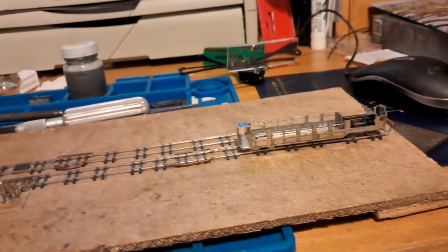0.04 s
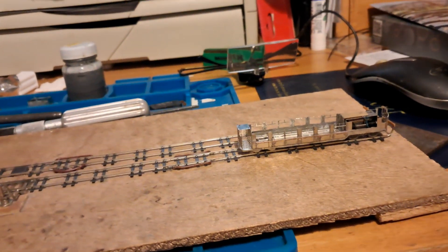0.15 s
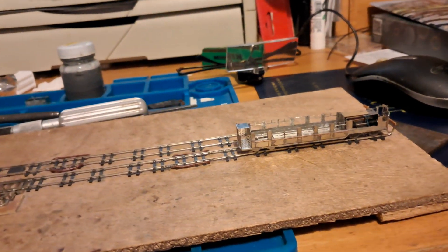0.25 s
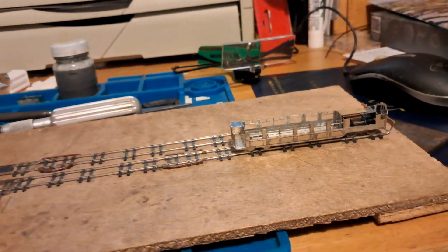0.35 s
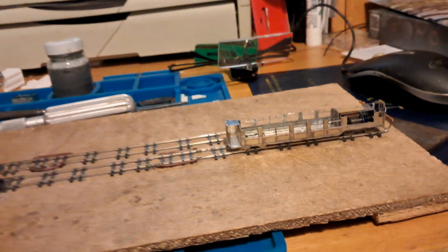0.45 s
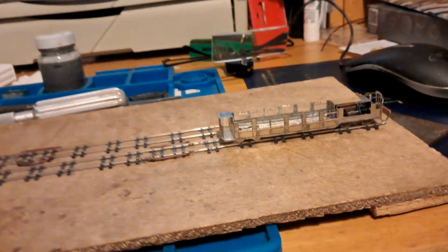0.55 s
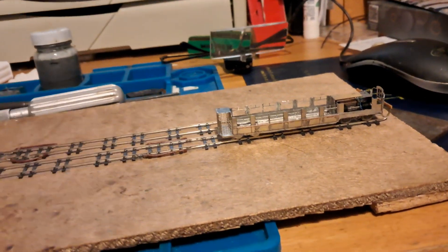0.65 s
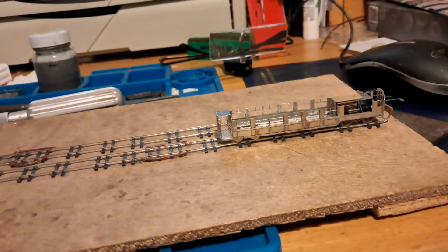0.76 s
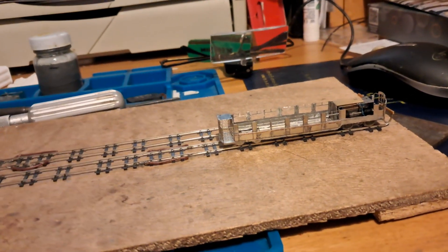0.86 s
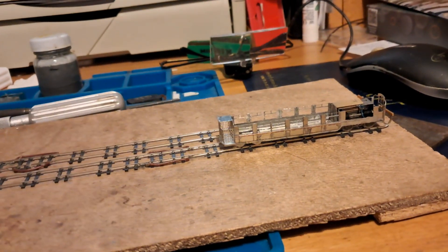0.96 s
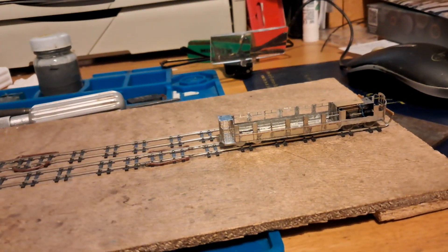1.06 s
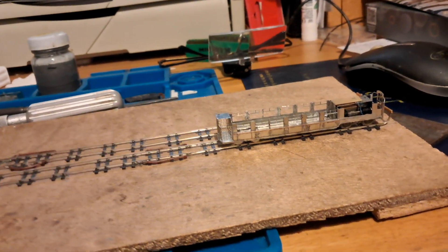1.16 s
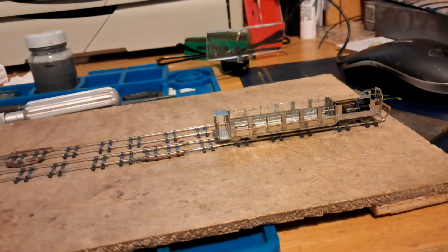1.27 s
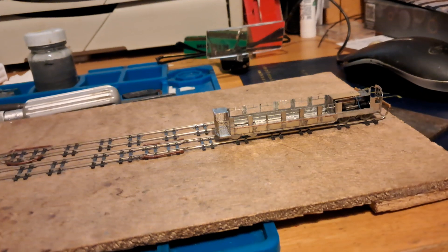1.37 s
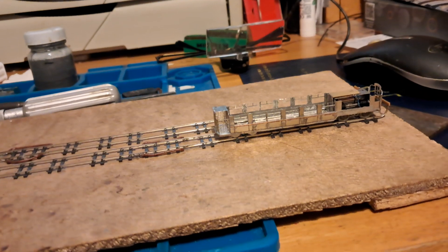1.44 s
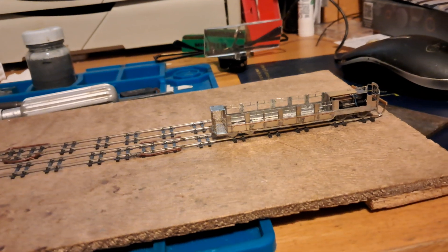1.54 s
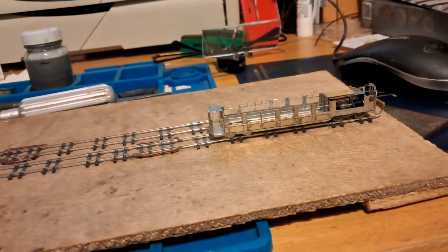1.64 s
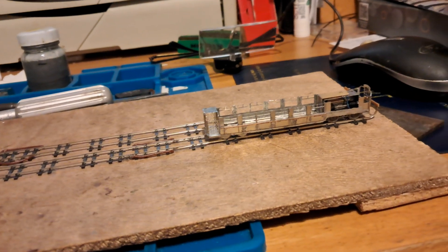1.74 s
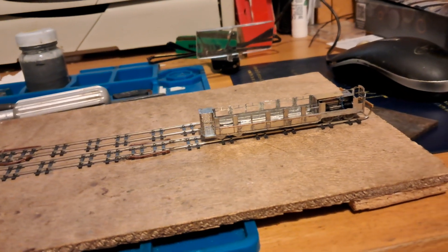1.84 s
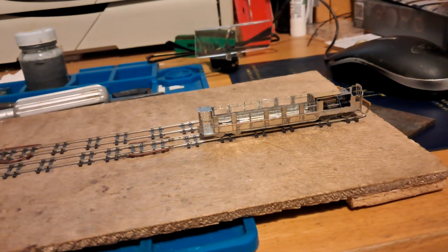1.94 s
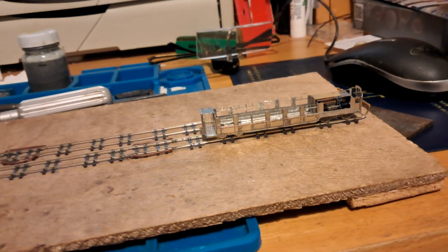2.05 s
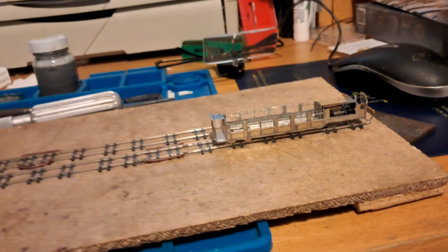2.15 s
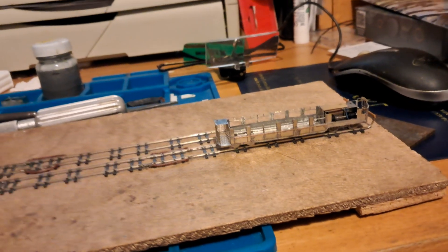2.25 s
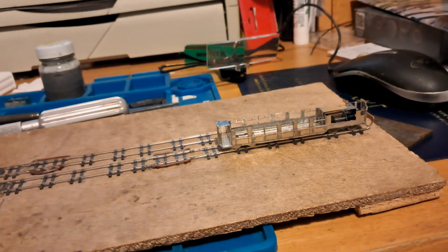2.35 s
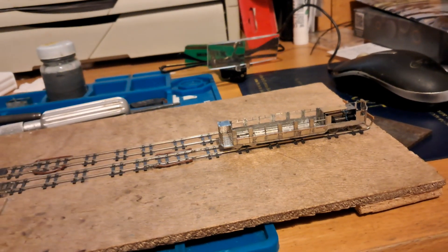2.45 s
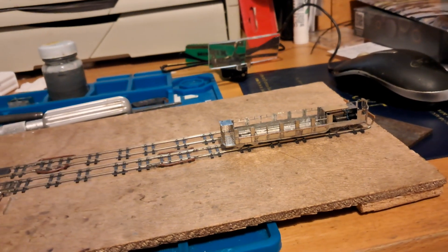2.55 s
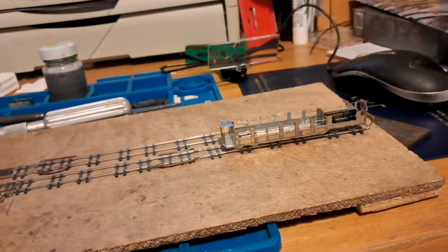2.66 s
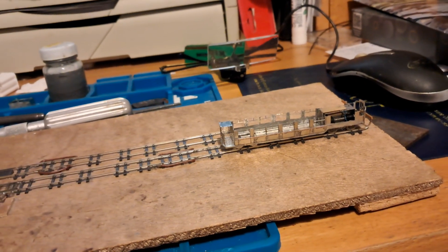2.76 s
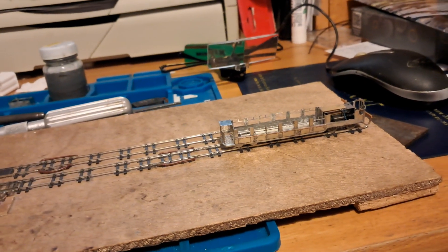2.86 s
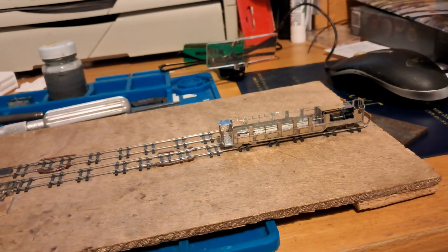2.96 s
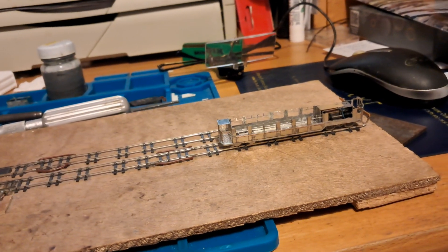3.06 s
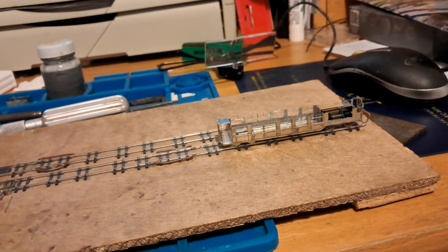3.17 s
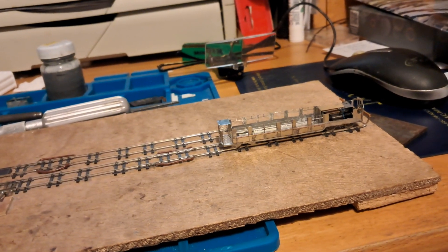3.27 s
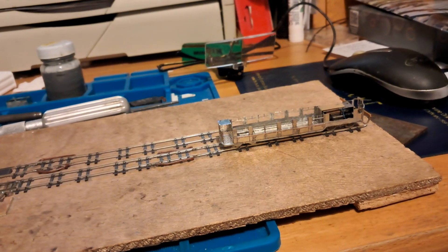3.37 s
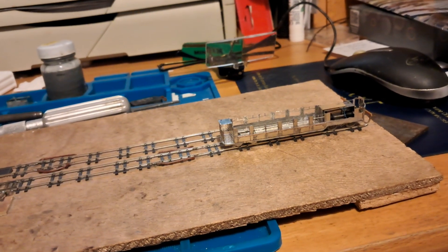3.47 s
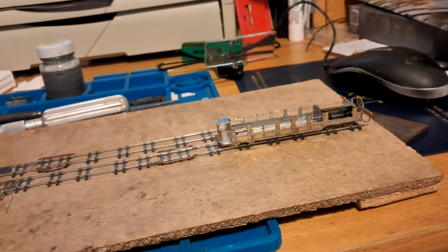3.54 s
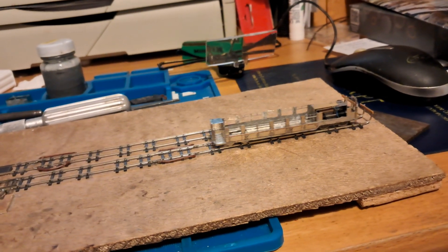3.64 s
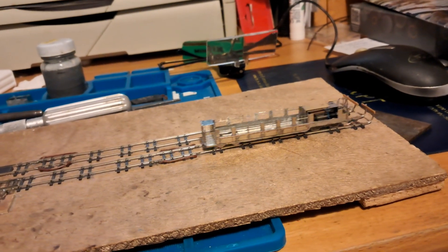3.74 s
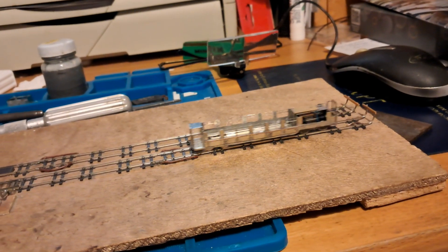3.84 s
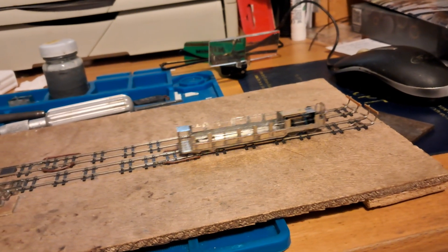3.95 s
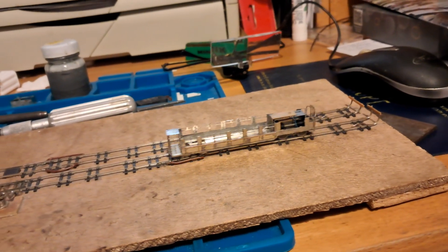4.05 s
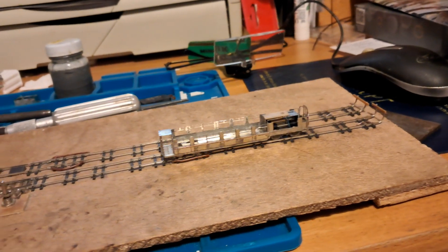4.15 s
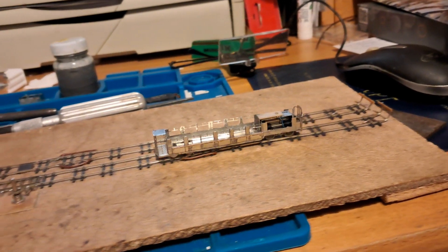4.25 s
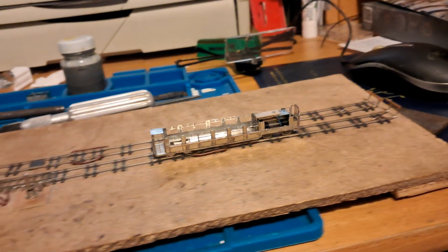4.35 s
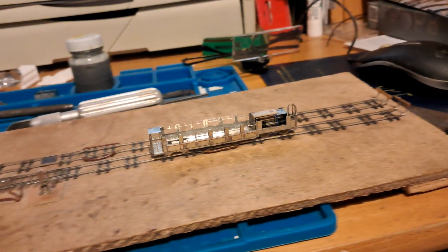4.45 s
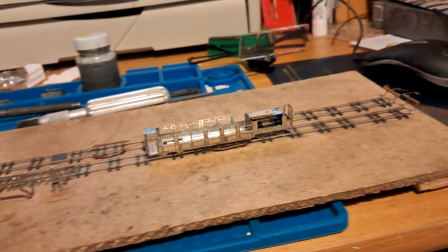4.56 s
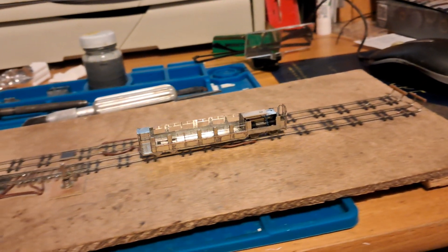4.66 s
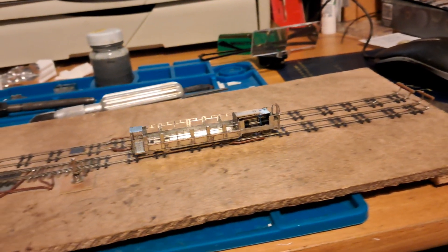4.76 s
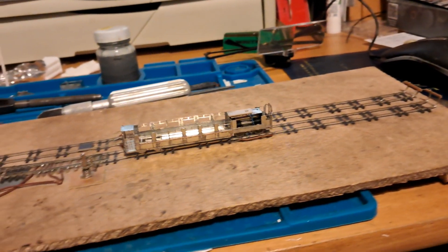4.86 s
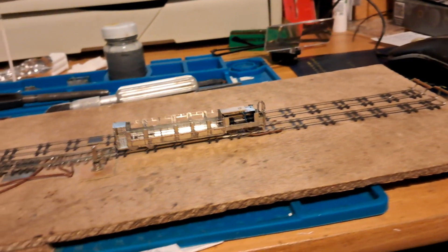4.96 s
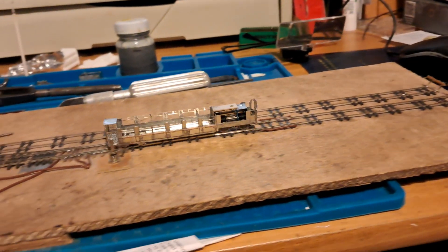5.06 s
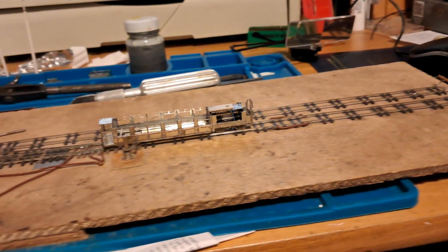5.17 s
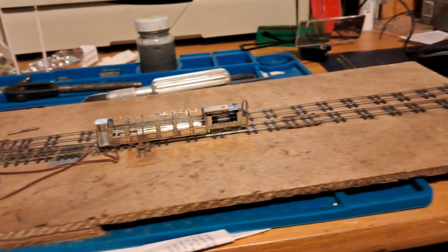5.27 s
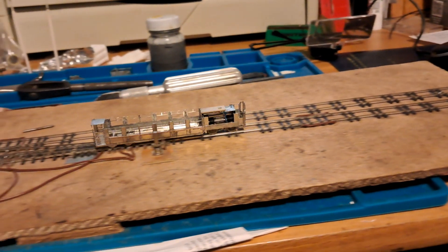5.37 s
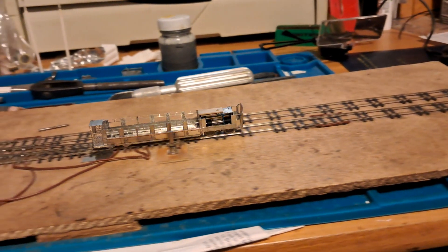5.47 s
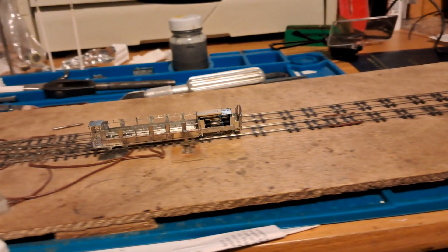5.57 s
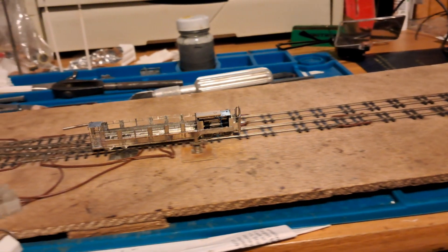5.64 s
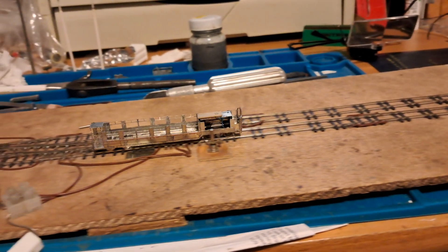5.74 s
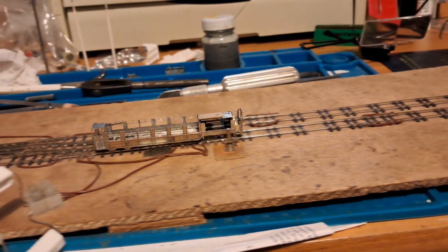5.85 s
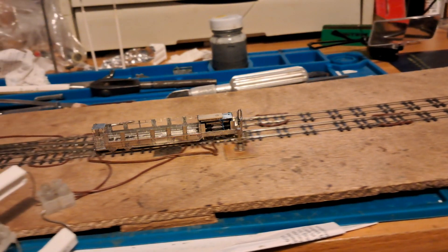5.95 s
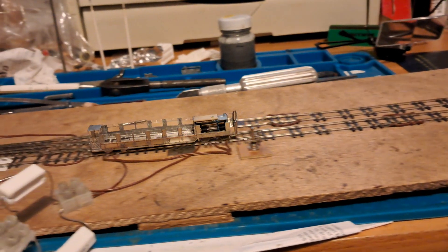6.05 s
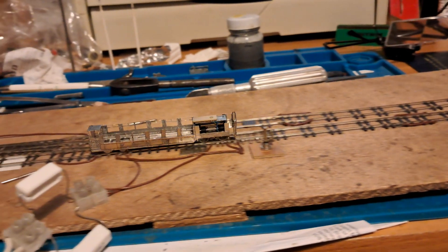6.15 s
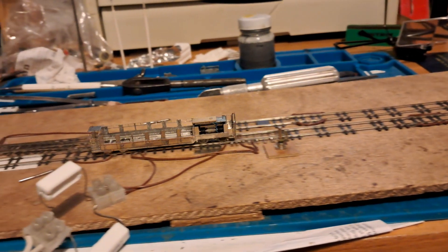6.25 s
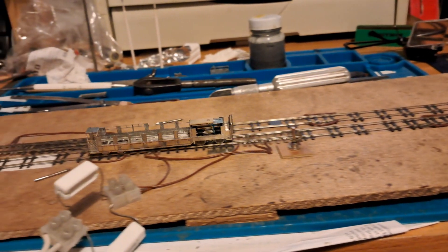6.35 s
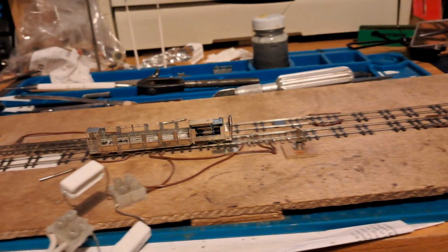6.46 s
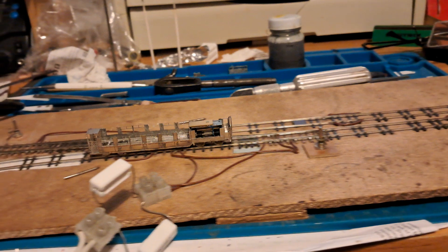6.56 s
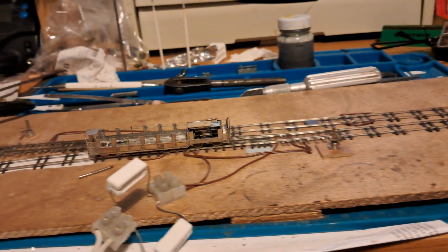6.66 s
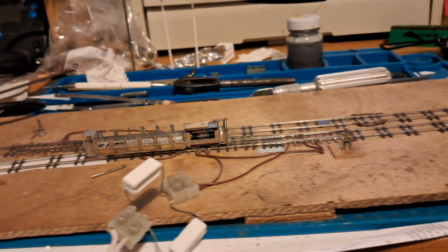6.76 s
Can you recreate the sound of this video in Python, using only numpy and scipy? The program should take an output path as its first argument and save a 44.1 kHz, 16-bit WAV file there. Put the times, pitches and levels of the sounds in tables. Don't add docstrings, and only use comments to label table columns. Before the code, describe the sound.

Half the time is near silence: still air, faint hiss, tiny bench touches and two crisp switch clicks with a short room rattle. After a small creak, a miniature electric rail car bursts into motion. Its gears chatter in thin metal, the wooden plank drums along, wheels knock and tick over joints. The tone shifts from bright and rattly, to thinner, to woodier and fuller, heard close in stereo and still running at the cut.

```python
import sys
import numpy as np
from scipy import signal
from scipy.fft import rfft, irfft, next_fast_len
from scipy.io import wavfile
from scipy.ndimage import uniform_filter1d

SR = 44100
rng = np.random.default_rng(int(sys.argv[2]) if len(sys.argv) > 2 else 0)


def log_audio(samples):
    frames = np.atleast_2d(samples).T
    limited = np.clip(frames, -1, 1)
    pcm = np.round(limited * 32767).astype(np.int16)
    wavfile.write(sys.argv[1], SR, pcm)


def makeup_ratio(level_db):
    decades = np.asarray(level_db, float) / 20
    return 10 ** decades


N = 300321
TIME = np.arange(N) / SR
SIDES = np.array([[1], [-1]])
START_S = 3.53
PLANK_RISE_S, FRAME_RISE_S = 0.02, 0.016


def car():
    t = TIME[TIME > START_S]
    shaft_hz = 98 * (1 + .02 * walk(6, len(t))[0])
    turns = np.cumsum(shaft_hz) / SR
    jolt = np.exp(-3.6 * (turns % 1))
    push = gears(t, jolt)
    between = scatter(push + 1.14 * chatter(3000, 2.0, len(t)), 0.0034, rate=24)
    whole = plank(t, push, between) + frame(t, push, between) + brushes(t, push, jolt)
    return np.pad(whole, ((0, 0), (N - len(t), 0)))


# start in seconds, peak in dB.
KNOCKS = [(3.6, -15), (3.763, -2), (3.921, -16), (3.959, -26), (4.014, -5), (4.051, 0), (4.086, -12),
          (4.238, -3.5), (4.351, -12), (4.469, -22), (4.672, -12), (4.726, -9.5), (4.838, -12),
          (4.943, -14), (4.983, -18), (5.222, -39), (5.261, -20), (5.388, -5), (5.445, -5.5), (5.584, -13),
          (5.718, 2), (5.878, -5), (5.964, -22), (6.025, -11), (6.136, -9), (6.379, -12), (6.501, -18),
          (6.565, -1.5), (6.637, -10)]


def gears(t, jolt):
    drum_db = np.maximum(loudness(t, "ring", PLANK_RISE_S), loudness(t, "boom", PLANK_RISE_S))
    knocks = np.zeros(len(t))
    for s, db in KNOCKS:
        knocks[int((s - START_S) * SR)] = makeup_ratio(db - np.interp(s, t, drum_db) - 5.5)
    force = makeup_ratio(0.5 * walk(60, len(t))[0] + 3.3 * jolt)
    return unit(force * chatter(4000, 3.64, len(t))) + knocks


# frequency in Hz, width in Hz, level in dB at each place along the track, left-right in dB.
BOOM_MODES = [(625, 83, -37, -23, -6.5, -4, 8.5), (774.6, 15, -8.5, -14, -3, 0.5, -2),
              (875.3, 25.4, 8.5, 5, 6.5, 8.5, 3.5), (980, 18.5, -10, 7, -4.5, 2.5, -6)]
RING_MODES = [(1110, 31, -2, 3.5, 1, -2, 8), (1200, 22, 1, 3, -10.5, -4, -13),
              (1379, 45, -5, -7, -13.5, -11, -6.5), (1432, 13.5, 8, -3, -4, 2.5, 3)]
CLACK_MODES = [(1586, 18, 1.5, 1, 2, -2.5), (1700, 44, 1.5, 5, -2.5, -3), (1832, 75, -15.5, 4, -10, -4.5),
               (1927, 82, -8.5, -11, -4.5, 4)]
PLANK_PLACES_S = [4.2, 4.85, 5.6, 6.05]
CLACK_PLACES_S = [3.65, 5.61, 6.2]
# frequency in Hz, level in dB per Hz.
RUMBLE = [(24, -56), (40, -18), (91, -23.5), (129, -9.5), (167, -18.5), (204, -8), (322, -16.5), (600, -7),
          (780, -50), (1320, -120)]
BEARING_DB = (.3, 0, -3, -3), (3, 6, -0.1, -1.7)


def plank(t, push, between):
    boom, ring, clack = (loudness(t, part, PLANK_RISE_S) for part in ("boom", "ring", "clack"))
    low = makeup_ratio(boom) * body(t, push, between, BOOM_MODES, (690, 1080), -5.0,
                           turn=0.52, lead=0.14, places=PLANK_PLACES_S)
    rumble_db = 0.62 * effort(t) + 0.4 * boom - 23
    low = low + makeup_ratio(rumble_db) * unit(colour(pair(len(t)), RUMBLE))
    mid = makeup_ratio(ring) * body(t, push, between, RING_MODES, (1030, 1570), -7.0,
                           turn=0.63, lead=1.74, places=PLANK_PLACES_S)
    mid = mid + makeup_ratio(clack) * body(t, push, between, CLACK_MODES, (1530, 2170), -3.5,
                                  turn=0.7, lead=1.42, places=CLACK_PLACES_S)
    pan_db = np.interp(t, STRETCH_S, BEARING_DB[0])
    return low + makeup_ratio(1.0 + SIDES * pan_db / 2) * mid


# frequency in Hz, width in Hz, level in dB at the four places, left-right in dB.
CHASSIS_MODES = [(2273, 12, -20, -7, 6, 7.5, 2.6), (2651, 90, 2.5, -5.5, 4, 0.5, 9.6),
                 (2753, 117, -4, -15, 6.5, -2, 7.7), (2915, 71, -2.5, -8, 2, 1.5, 11.5),
                 (3127, 110, -0.5, -3.5, -6, -12, 6.3)]
TANK_MODES = [(3400, 86, -3.5, 4, 1, -4, 7.9), (3490, 99, 5, 3.5, -1, 1, 8.7),
              (3720, 680, -6, -14, -7, -8, 8.7)]
RAILING_MODES = [(4423, 98, 1, 0, -2.5, -2, -8.5), (4704, 220, 1, 2, -6, -1, -9.5),
                 (4870, 166, -3, 6, -2.5, 5.5, -8), (5220, 190, -3.5, 2, -11, -2.5, -3.5),
                 (5320, 130, -13, -8, -2, -5, -7)]
WHEEL_MODES = [(6150, 310, -3.5, -6, 1, 6.5, 1.1), (6630, 250, -4, 1, -1, 7.5, 1.7),
               (7020, 270, 0.5, -4.5, -18, 1, 4.1)]
FRAME_PLACES_S = [4.2, 4.9, 6.05, 6.4]


def frame(t, push, between):
    close = scatter(push + 0.35 * chatter(3000, 3.5, len(t)), 0.0015, rate=12)
    chassis, tank, rails, wheels = (loudness(t, part, FRAME_RISE_S) for part in ("chassis", "tank", "rails", "wheels"))
    high = makeup_ratio(chassis) * body(t, push, between, CHASSIS_MODES, (2120, 3280), -6.5,
                               turn=.9, lead=1.18, places=FRAME_PLACES_S)
    high = high + makeup_ratio(tank) * body(t, push, between, TANK_MODES, (3220, 4130), -5,
                                   turn=1.0, lead=1.3, places=FRAME_PLACES_S)
    high = high + makeup_ratio(rails) * body(t, push, close, RAILING_MODES, (4050, 5650), -3.0,
                                    turn=0.42, lead=1.15, places=FRAME_PLACES_S, own=0.42)
    high = high + makeup_ratio(wheels) * body(t, push, close, WHEEL_MODES, (5550, 7500), -0.82,
                                     turn=0.39, lead=1.45, places=FRAME_PLACES_S, own=0.71)
    pan_db = np.interp(t, STRETCH_S, BEARING_DB[1])
    return makeup_ratio(0.5 + SIDES * pan_db / 2) * high


# frequency in Hz, level in dB per Hz.
BRUSHES_FACING = [(4470, -38), (7600, -25), (8330, -18), (9360, -10.5), (12000, -3), (14200, -5.5),
                  (15100, -4), (15800, -5)]
BRUSHES_AWAY = [(4470, -40), (7600, -10.5), (8200, -12.5), (9680, -14), (12500, -2.5), (14500, -2.5),
                (15100, -2), (15800, -3)]
AWAY_S = (4.8, 5.65)


def brushes(t, push, jolt):
    n = len(t)
    sparks = makeup_ratio(3.5 * walk(160, n)[0]) * rng.standard_normal(n) + .5 * push
    rub = makeup_ratio(2.1 * walk(130, n)[0]) * rng.standard_normal((2, n))
    air = unit(scatter(sparks, 0.0017, rate=15)) + 0.99 * rub
    skip_db = walk(260, n)[0]
    air = air * makeup_ratio(skip_db) * makeup_ratio(6.5 * jolt)
    air = air + 0.47 * scatter(chatter(450, 3.2, n), 0.00036, rate=30) * np.std(air) / 3.3

    def shaped(points):
        return unit(colour(air, points[:-2] + [(16500, points[-3][1])]))

    away = np.interp(t, AWAY_S, (0, 1))
    hiss = (1 - away) * shaped(BRUSHES_FACING) + away * shaped(BRUSHES_AWAY)
    return makeup_ratio(effort(t) - SIDES * 0.69) * hiss


# time in seconds, level in dB.
MOTOR = [(3.6, -41), (4.0, -36.5), (4.9, -36), (5.1, -37.5), (6.7, -37), (6.81, -36)]


def effort(t):
    return np.interp(t, *np.transpose(MOTOR)) + spin_up(t, FRAME_RISE_S)


def spin_up(t, rise_s):
    return -81 * np.exp((START_S - t) / rise_s)


STRETCH_S = [4.0, 4.25, 5.7, 6.5]
PARTS = {"boom": ((-52.5, -47, -36.5, -38), (0.84, 0.011, 0.07)), "ring": ((-40.5, -41, -40.5, -41),
         (0.95, 0.0089, 0.0084)), "clack": ((-41, -41, -40, -39.5), (0.36, 0.17, .01)),
         "chassis": ((-40.5, -41.5, -40.5, -41.5), (0.012, 0.98, .01)), "tank": ((-42.5, -40.5, -41, -41.5),
         (.01, 0.36, 0.16)), "rails": ((-39, -41, -38.5, -40), (0.013, .01, 0.87)),
         "wheels": ((-41.5, -41.5, -45.5, -45), (0.013, 0.25, 0.49))}
# time in seconds, level in dB.
PLANK_FREEDOM = [(3.62, -41), (3.72, -38), (4.43, -37), (4.96, -47), (5.05, -57), (5.25, -58.5),
                 (5.32, -46), (6.27, -37), (6.79, -39), (6.8, -36.5)]
# time in seconds, level in dB.
MESH = [(3.62, -35.5), (3.71, -39), (4.15, -35.5), (4.64, -51.5), (5.46, -46), (5.57, -50.5), (6.08, -38),
        (6.6, -41.5), (6.8, -39)]
# time in seconds, level in dB.
SLACK = [(3.62, -41.5), (4.03, -45), (4.09, -40), (4.74, -46.5), (5.82, -46.5), (6.11, -36.5), (6.13, -42),
         (6.56, -38), (6.8, -41)]
SWELLS = {"boom": [(5.11, .04, 3.5), (5.21, .04, -2.5), (4.2, 0.098, 3.5), (4.93, 0.028, 5.5),
          (5.36, 0.048, 4.5), (5.72, 0.016, 7.5), (6.81, 0.017, 6)], "clack": [(3.68, 0.076, 3),
          (4.54, 0.13, -9), (4.3, 0.12, 1), (5.2, 0.098, 6.5), (4.84, 0.14, 9), (5.42, 0.08, 6.5),
          (5.0, .06, 1.5), (4.8, 0.047, 1.5), (6.81, 0.016, 8.5)], "tank": [(4.43, 0.1, 4), (4.7, 0.05, 4),
          (5.12, 0.034, 3.5), (6.41, 0.071, 5.5)], "rails": [(4.29, 0.066, 5), (4.5, 0.024, 5.5),
          (5.97, 0.05, 4.5), (3.65, 0.069, 1.5), (6.09, 0.044, 2.5), (6.2, 0.049, -1.5), (6.45, 0.092, 1.5),
          (6.62, 0.11, 2)], "ring": [(5.14, 0.063, -4), (3.7, 0.15, -2), (6.6, 0.13, -0.5), (6.1, .1, 1),
          (4.4, 0.066, 0), (6.1, 0.042, -3), (4.1, 0.066, 3.5), (5, 0.063, 4.5)],
          "chassis": [(3.3, 0.029, 4.5), (6.3, 0.079, 1), (2.5, .08, 2), (6.1, 0.036, 3),
          (6.42, 0.04, 3.5)], "wheels": [(4.1, 0.042, 7.5), (4.29, 0.04, 6), (4.49, 0.022, 8.5),
          (5.97, 0.071, 6.5), (6.23, 0.03, 7.5)]}


def loudness(t, part, rise_s):
    along_db, shares = PARTS[part]
    db = np.interp(t, STRETCH_S, along_db) + spin_up(t, rise_s)
    for share, control in zip(shares, (PLANK_FREEDOM, MESH, SLACK)):
        db = db + share * (np.interp(t, *np.transpose(control)) + 42)
    for s, half_s, lift_db in SWELLS[part]:
        db = db + lift_db * np.exp(-((t - s) / half_s) ** 2)
    return db


def body(t, shared, between, modes, edge_hz, between_db, turn, lead, places, wander_db=1.16, own=0.69):
    push = unit(shared + own * chatter(3000, 3.8, len(t)))
    out, power = 0, makeup_ratio(2 * between_db)
    whole = sum(mode[1] * makeup_ratio(2 * mode[2]) for mode in modes)
    for k, (hz, width, *db, pan_db) in enumerate(modes):
        pole = np.exp((2j * np.pi * hz - np.pi * width) / SR)
        z = signal.lfilter([1], [1, -pole], push)
        z = (-1) ** k * z / np.sqrt(np.mean(np.abs(z) ** 2) / 2)
        phase, drift = walk(4.96, len(t), count=2)
        gain = np.sqrt(width / whole) * makeup_ratio(np.interp(t, places, db) + wander_db * drift)
        heard = np.imag(z * np.exp(.5j * SIDES * (lead + turn * phase)))
        out = out + gain * makeup_ratio(SIDES * pan_db / 2) * heard
        power = power + gain ** 2
    fill = makeup_ratio(between_db) * unit(band(between, *edge_hz))
    return (band(out, *edge_hz, order=3) + fill) / np.sqrt(power)


def scatter(push, spread_s, rate):
    paths = rng.standard_normal((4, 2, 1024)) * np.exp(-TIME[:1024] / spread_s)
    heard = signal.fftconvolve(push[None, None], paths, axes=2)[..., :len(push)]
    share = walk(rate, len(push), count=4)
    share = share / np.sqrt(np.sum(share ** 2, axis=0))
    return np.sum(heard * share[:, None], axis=0)


def chatter(rate_hz, spread_db, n, most=3.84):
    hit, size, sign = rng.random((3, n))
    size_db = spread_db * np.minimum(-np.log(1 - size), most)
    return unit((hit < rate_hz / SR) * makeup_ratio(size_db) * (sign - .5))


# start in seconds, peak in dB, centre in Hz.
COUPLINGS = [(3.563, -32, 2970), (3.57, -31, 3040), (3.5735, -25, 3050), (3.6002, -24, 2750),
             (3.749, -32, 2730), (3.766, -21, 2700), (3.835, -23.5, 3080), (3.8903, -29, 2980),
             (3.921, -16, 3070), (3.959, -22, 2700), (4.0135, -20, 2850), (4.04, -26, 2670),
             (4.0517, -20, 3080), (4.106, -15, 3150), (4.1799, -24, 2680), (4.2009, -26, 2670),
             (4.2394, -31, 2730), (4.351, -16, 3490), (4.392, -17.5, 3500), (4.4235, -25, 3400),
             (4.4443, -36, 3430), (4.6828, -32, 3510), (4.9831, -31, 3520), (6.0736, -31, 2770),
             (6.0926, -24, 2770), (6.1549, -41, 2790), (6.195, -36, 2680), (6.2064, -20, 2720),
             (6.3755, -28, 2680), (6.3944, -26, 3440), (6.4128, -25, 2800), (6.5316, -30, 2690)]
# start in seconds, peak in dB, centre in Hz.
FLANGES = [(3.5643, -34, 4750), (3.576, -31, 4520), (3.5783, -24, 4690), (3.6004, -26, 4560),
           (3.709, -33, 4730), (3.7654, -26, 4640), (3.9215, -31, 5880), (4.0393, -26, 4710),
           (4.0597, -27, 6180), (4.0867, -25, 5970), (4.0961, -17.5, 5900), (4.14, -12, 4190),
           (4.2387, -23, 7250), (4.2702, -20, 5220), (4.2902, -16, 4740), (4.3498, -20, 4550),
           (4.4119, -36, 5240), (4.4755, -23, 7050), (4.4846, -18, 4650), (4.4992, -21, 4700),
           (4.7252, -27, 5270), (4.9847, -30, 4700), (5.236, -34, 4770), (5.605, -31, 6150),
           (5.6636, -31, 4550), (5.7224, -25, 4470), (5.7549, -23, 4860), (5.8786, -39, 4650),
           (5.9654, -26, 5620), (6.024, -19, 4340), (6.0831, -27, 4410), (6.1959, -35, 6200),
           (6.208, -27, 6250), (6.2931, -27, 5230), (6.3221, -28, 4890), (6.3949, -23, 4850),
           (6.4692, -31, 5140), (6.5067, -38, 4840), (6.5326, -27, 4840), (6.5645, -28, 4760),
           (6.6099, -28, 4660), (6.6538, -29.5, 4650), (6.6613, -27, 4900), (6.7371, -23, 4770)]
# start in seconds, peak in dB.
SPARKS = [(3.5623, -42), (3.5748, -40), (3.8043, -26), (3.8881, -29), (3.941, -28), (4.0113, -26),
          (4.0517, -33), (4.0862, -24), (4.1171, -20), (4.1999, -36), (4.2084, -26), (4.2897, -24),
          (4.361, -19), (4.4204, -27), (4.5107, -25), (4.5591, -33), (4.609, -25), (4.6713, -27),
          (4.7791, -29), (4.8295, -23), (4.8908, -21.5), (4.9627, -32), (4.9821, -29), (5.0011, -31),
          (5.0614, -36), (5.1722, -38.5), (5.18, -25), (5.2206, -36), (5.2316, -31), (5.3408, -32),
          (5.3542, -26), (5.3712, -26), (5.4421, -28), (5.4915, -35), (5.5404, -39), (5.675, -31),
          (5.7434, -25), (5.8137, -22), (5.9629, -27), (6.0153, -30), (6.147, -33), (6.1934, -31),
          (6.2128, -32), (6.2622, -30), (6.556, -30), (6.5635, -31), (6.5945, -34), (6.6324, -38),
          (6.7067, -31), (6.7735, -34)]


def pings():
    out = ticks(COUPLINGS, ring_s=0.00084, wide=0.47, lift_db=-2.5)
    out = out + ticks(FLANGES, ring_s=0.00082, wide=0.92, lift_db=-1.0)
    return out + ticks([(*row, 12200) for row in SPARKS], ring_s=0.00036, wide=0.88, lift_db=0.0)


# frequency in Hz, level in dB.
PORT = [(7000, 3), (7700, -10), (9600, 3), (11500, 5.5)]


def ticks(rows, ring_s, wide, lift_db, apart=0.96):
    out, t = np.zeros((2, N + 512)), TIME[:512]
    for (s, db, hz), noise in zip(rows, rng.standard_normal((len(rows), 2, len(t)))):
        both = noise[0] + apart * SIDES * noise[1]
        ping = band(both * np.exp(-t / ring_s), hz * (1 - wide / 2), hz * (1 + wide / 2), order=2)
        out[:, int(s * SR):][:, :len(t)] += makeup_ratio(db + lift_db) * ping / np.max(np.abs(ping))
    return colour(out[:, :N], PORT)


# start in seconds, peak in dB, crack in seconds, rattle in dB, rattle bass lift in dB.
SNAPS = [
    (1.1837, -62.5, 0.0018, -3.5, 14),
    (1.198, -59, 0.0018, 1, 16),
    (1.205, -33, 0.0015, -19, 7.5),
    (1.4627, -29.5, 0.0032, -17, 1),
    (1.474, -31, 0.0027, -25, 9),
]
# frequency in Hz, level in dB per Hz.
SNAP_COLOUR = [(290, -37), (500, -10.5), (650, -24), (857, -1), (1020, -17), (1250, -23), (1650, -3),
               (2340, -20), (2670, -7.5), (6380, -2), (8790, -22), (12800, -6), (16200, -12)]


def snaps(t60=0.23, cut_s=0.13):
    out, t = np.zeros((2, N)), TIME[:8192]
    for s, db, crack_s, rattle_db, bass_db in SNAPS:
        treble_db = 18.5 - 4300 * crack_s
        crack_shape = [(hz, v + treble_db * (hz > 8000) - 6 * (hz < 2400)) for hz, v in SNAP_COLOUR]
        rattle_shape = [(hz, v + bass_db * (hz < 2400)) for hz, v in SNAP_COLOUR]
        crack = unit(colour(rng.standard_normal((2, len(t))), crack_shape))
        crack = makeup_ratio(7 * SIDES / 2) * crack * np.exp(-(t / crack_s) ** 2) / 2
        rattle = unit(colour(rng.standard_normal((2, len(t))), rattle_shape))
        rattle = rattle * makeup_ratio(2.0 * walk(290, len(t))) * 1000 ** (-t / t60 - (t / cut_s) ** 4)
        out[:, int(s * SR):][:, :len(t)] += makeup_ratio(db) * (crack + makeup_ratio(rattle_db) * rattle)
    return out


# start in seconds, rms in dB, centre in
# Hz, width in Hz, held in seconds.
SCUFFS = [(.001, -73.5, 813, 150, 0.22), (.549, -74, 5100, 900, 0.065), (.556, -75, 6330, 900, 0.057),
          (.716, -75, 6400, 900, 0.014), (.706, -80, 4800, 3400, .03), (.77, -85, 3460, 900, 0.033),
          (1.439, -81, 3200, 2400, 0.02), (1.21, -78, 860, 250, 0.15), (1.212, -66.5, 1700, 600, 0.047),
          (1.211, -70, 3000, 1400, 0.042), (1.53, -81, 1900, 500, 0.07), (1.62, -89, 6500, 900, 0.11),
          (2.46, -78.5, 1550, 300, 0.16), (2.6, -79.5, 1530, 600, 0.24)]
# start in seconds, rms in dB, centre in Hz,
# width in Hz, t60 in seconds.
TAPS = [(0.519, -73, 2190, 2550, 0.37), (.556, -74, 10500, 8000, .025), (.571, -77, 9000, 7000, .02),
        (1.192, -71, 900, 300, 0.29), (1.58, -71.5, 5000, 2500, 0.18), (1.79, -75.5, 6200, 4000, 0.054),
        (1.793, -78, 3500, 200, 0.11), (2.201, -69.5, 1090, 1400, 0.15), (2.206, -83, 4500, 2500, .06),
        (2.199, -70, 400, 300, 0.22), (2.423, -71, 1500, 700, 0.2), (2.536, -74, 2050, 2200, 0.17),
        (2.758, -73.5, 5700, 2600, 0.1), (2.79, -82.5, 3160, 1200, .08), (2.954, -76, 1940, 1820, 0.072),
        (3.537, -61, 2580, 1300, 0.04), (3.546, -54, 2780, 3000, 0.08), (3.553, -59, 9500, 11000, .08)]


def bench():
    out, t = np.zeros((2, N)), TIME[:32768]
    rows = [(*row, 0.1) for row in SCUFFS]
    rows += [(*row, 0.004, t60) for *row, t60 in TAPS]
    for s, db, hz, width, held, t60 in rows:
        noise = unit(band(pair(len(t)), hz - width / 2, hz + width / 2, order=3))
        shape = np.minimum(t / (0.078 * held), 1) * 1000 ** (-np.maximum(t - held, 0) / t60)
        out[:, int(s * SR):][:, :len(t)] += makeup_ratio(db) * noise * shape
    return colour(out, PORT)


# time in seconds, pitch in Hz, level in dB.
CREAK = [(3.1, 367, -90), (3.114, 364, -79), (3.134, 306, -75), (3.164, 356, -65), (3.194, 340, -71),
         (3.246, 365, -55.5), (3.274, 377, -75), (3.338, 340, -74), (3.37, 320, -90)]


def chair():
    s, hz, db = np.transpose(CREAK)
    wobble = 1 + .03 * walk(80, N)[0]
    phase = 2 * np.pi * np.cumsum(np.interp(TIME, s, hz) * wobble) / SR
    level = makeup_ratio(np.interp(TIME, s, db, -120, -120) + 5.5 + 1.8 * walk(60, N)[0])
    grit = makeup_ratio(-11) * unit(band(pair(N), 220, 440, order=2))
    return level * (np.sin(phase) + makeup_ratio(-22) * np.sin(2 * phase) + grit)


# frequency in Hz, level in dB per Hz.
ROOM = [(12, -70), (20, -38), (75, -9.5), (171, -18.5), (209, -3.5), (252, -16.5), (665, -17), (723, -21),
        (800, -14.5), (1100, -28), (1430, -63), (2420, -120)]
HISS = [(650, -33), (1100, -4), (1200, -0.5), (1490, -6.5), (1760, -6), (2570, -13.5), (4330, -16),
        (5240, -20), (6550, -18), (7080, -35), (13200, -12.5), (15800, -19)]
# frequency in Hz, width in Hz, rms in dB.
FAN = [(200, 15, -77), (228.4, 26, -75), (769, 23, -80), (1516, 220, -81.5)]


def room():
    out = makeup_ratio(-70.5) * unit(colour(pair(N), ROOM)) + makeup_ratio(-78) * unit(colour(pair(N), HISS))
    flutter = makeup_ratio(walk(6.4, N))
    for hz, width, db in FAN:
        out = out + makeup_ratio(db) * flutter * unit(band(pair(N), hz - width / 2, hz + width / 2, order=1))
    return out


# frequency in Hz, likeness 0-1.
ALIKE = [(60, 0), (130, 0.8), (290, 0.8), (640, 0.35), (1410, 0), (3100, 0), (6820, 0), (15000, 0.05)]


def pair(n):
    hz, share = np.transpose(ALIKE)
    mid_db, side_db = 10 * np.log10((1 + SIDES * np.clip(share, -.95, .95)) / 2)
    mid, side = rng.standard_normal((2, n))
    return colour(mid, list(zip(hz, mid_db))) + SIDES * colour(side, list(zip(hz, side_db)))


def walk(rate, n, count=1):
    k = int(SR / rate)
    held = np.repeat(rng.standard_normal((count, n // k + 1)), k, axis=1)[:, :n]
    return 1.06 * uniform_filter1d(uniform_filter1d(held, k), k)


def unit(x):
    return x / np.sqrt(np.mean(x ** 2))


def colour(x, points):
    hz, db = np.transpose(points)
    n = next_fast_len(x.shape[-1] + 2048, True)
    f = np.maximum(np.arange(n // 2 + 1) * SR / n, 1)
    gain = makeup_ratio(np.interp(np.log(f), np.log(hz), db))
    return irfft(rfft(x, n) * gain, n)[..., :x.shape[-1]]


def band(x, lo_hz, hi_hz, order=4):
    sos = signal.butter(order, [lo_hz, min(hi_hz, .45 * SR)], "band", fs=SR, output="sos")
    return signal.sosfilt(sos, x)


def scene():
    return car() + pings() + snaps() + bench() + chair() + room()


def top_cut(x):
    return signal.sosfilt(signal.butter(12, 17000, fs=SR, output="sos"), x)


def record(dry):
    low_pass = signal.ellip(14, .5, 80, 15800, fs=SR, output="sos")
    mix = signal.sosfilt(low_pass, dry)
    return top_cut(mix)


dry = scene()
out = record(dry)
log_audio(out)
```